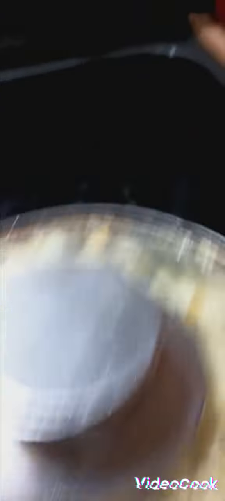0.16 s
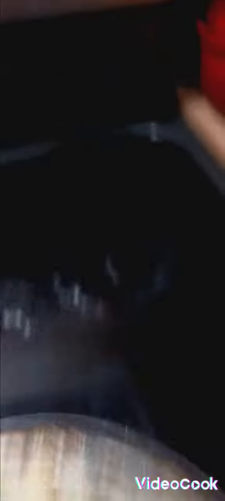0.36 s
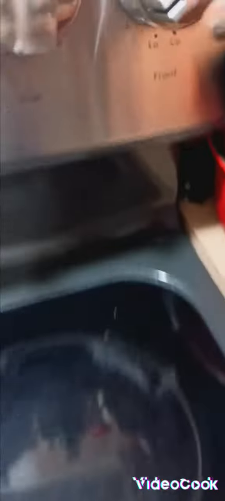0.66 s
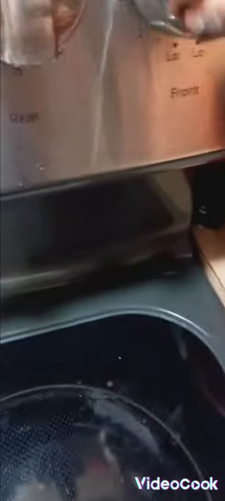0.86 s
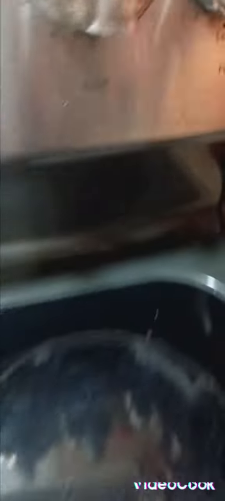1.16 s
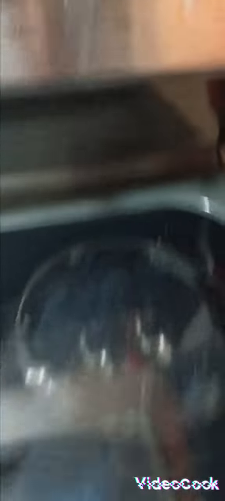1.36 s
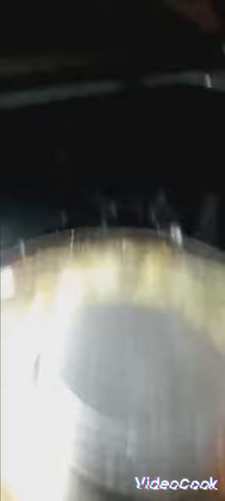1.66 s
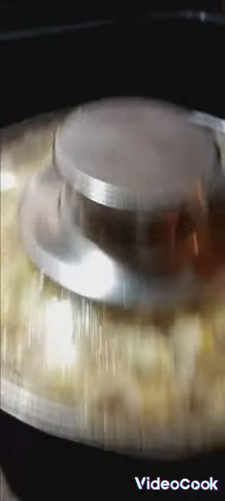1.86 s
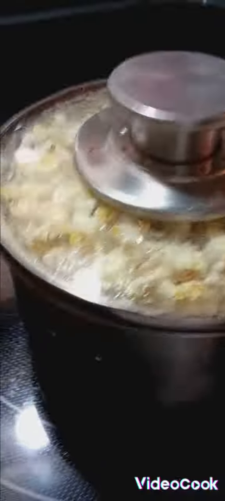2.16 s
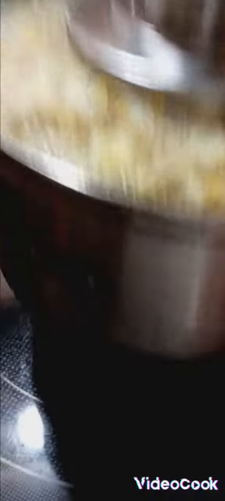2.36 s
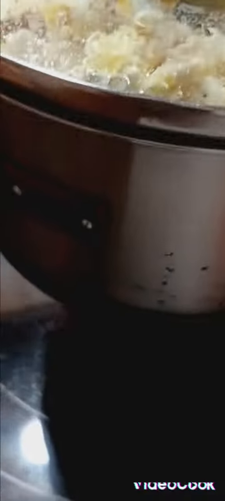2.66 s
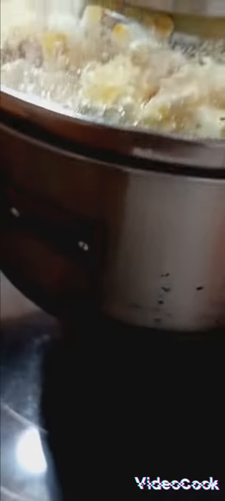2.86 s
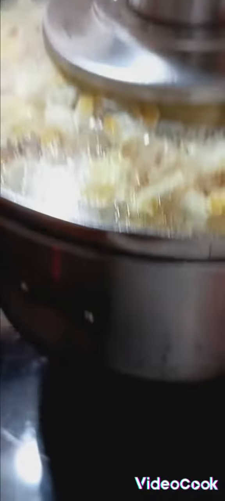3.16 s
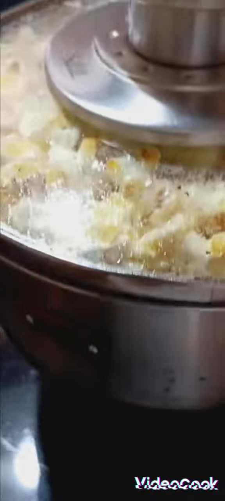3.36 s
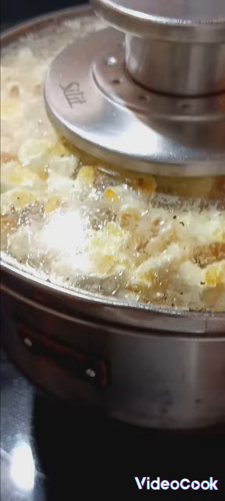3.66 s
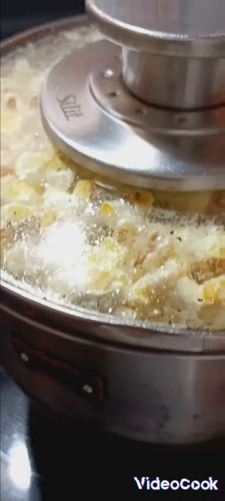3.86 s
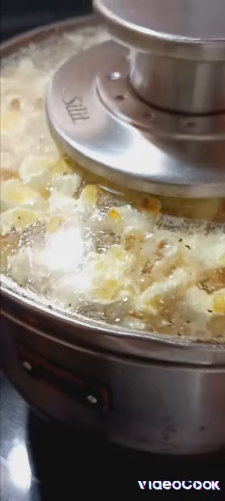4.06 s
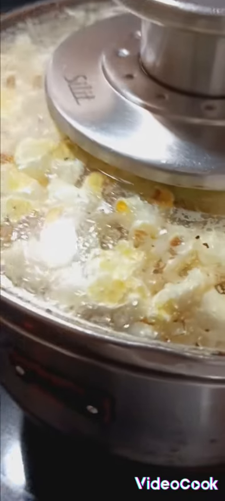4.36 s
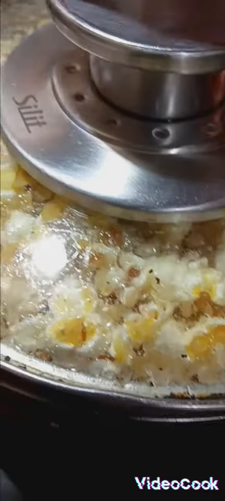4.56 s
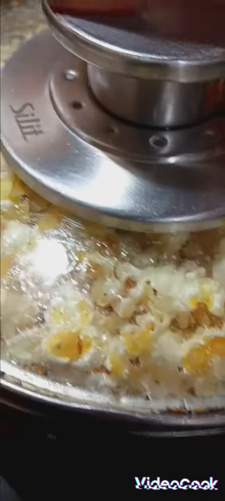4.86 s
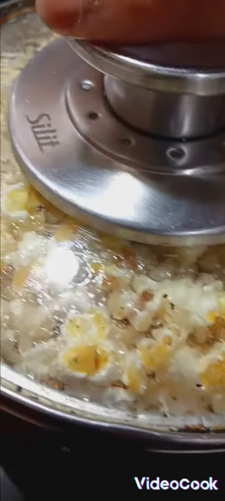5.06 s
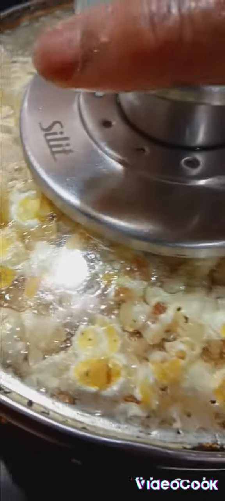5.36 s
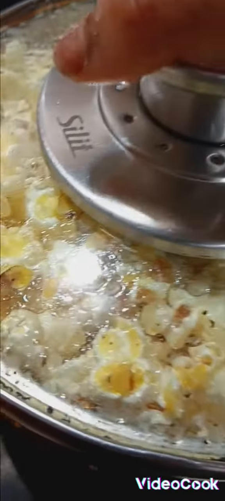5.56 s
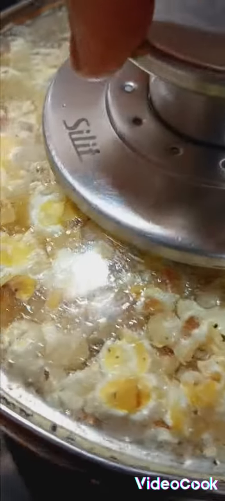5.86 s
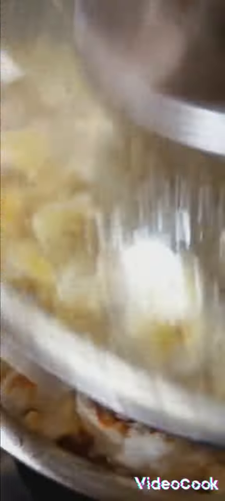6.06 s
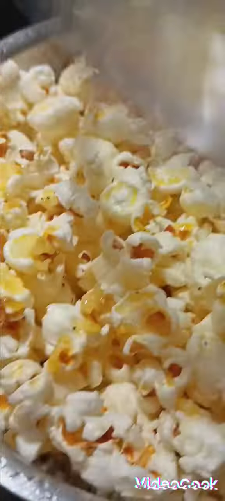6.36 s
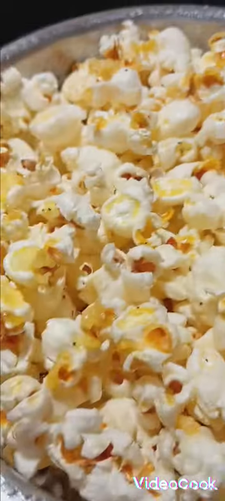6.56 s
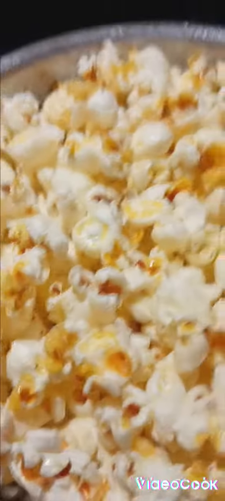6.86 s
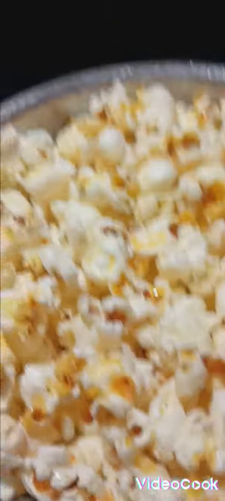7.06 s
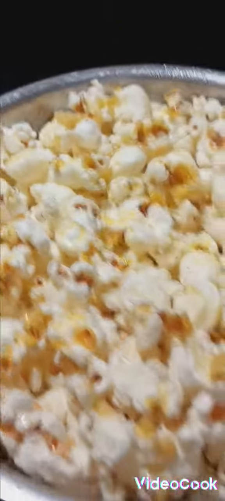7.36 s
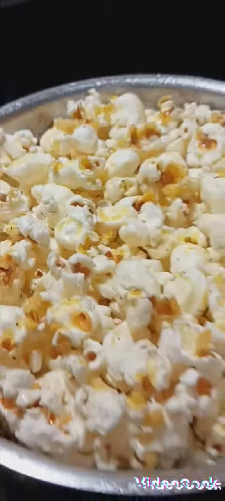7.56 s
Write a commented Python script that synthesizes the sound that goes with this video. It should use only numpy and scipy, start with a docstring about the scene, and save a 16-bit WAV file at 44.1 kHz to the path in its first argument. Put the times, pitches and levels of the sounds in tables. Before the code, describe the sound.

A close, hand-held stereo microphone at a kitchen stove hears a faint low hum, thin bright oil sizzle with tiny crackles, and soft low handling bumps. After a faint rustle, kernels burst in a covered steel pot from about 0.8 to 1.1 s: hollow thumps, sharp cracks and ringing clacks, the pops leaning left, with a soft noisy tail. A duller, heavier knock comes at 1.7 s and a faint one near 2. Then it is quiet, with small oil spits at 3.4 and 4.2 s. One lone pop sounds at 4.4 s; the sound drops out from 4.5 to 4.9 s. Spits and a very faint steam whistle follow, and the sizzle opens up near 6 s as the lid lifts. Dry hull ticks snap, clearest at 6.6 s. From 6.7 s to the end, corn knocks and rattles hard against the metal, with low thumps, droning and rustling.

```python
"""Last kernels in a popcorn pot

The last kernels burst in a steel pot on a stove; the lid comes off and the corn knocks and rattles.
Each blow layers a low thump of air, a clank of the pot and a hull's crack, with diffuse tails.
Blows are shaped noise and decaying sines; hot oil sizzles and spits in bright noise over a low hum.
The hand-held microphone rumbles with low bumps, and the sound cuts out once."""
import sys
import numpy as np
from scipy import signal
from scipy.fft import rfft, irfft, next_fast_len
from scipy.io import wavfile
from scipy.ndimage import uniform_filter1d

SR = 44100
rng = np.random.default_rng(int(sys.argv[2]) if len(sys.argv) > 2 else 0)


def wrap_up_sound(samples):
    """Save the sound to the file named by the first command line argument, as 16-bit audio."""
    columns = np.atleast_2d(samples).T
    # keep every value between -1 and 1, then stretch to whole-number steps
    tamed = np.clip(columns, -1, 1)
    steps = np.round(tamed * 32767).astype(np.int16)
    wavfile.write(sys.argv[1], SR, steps)


N = 340452
TOP_HZ = 16300  # nothing is heard above this
BLOW_S = .03  # a blow at 0 dB has the energy of rms 1 held this long
T = np.arange(int(.5 * SR)) / SR  # time within one short sound, s


def amp(db):
    """Decibels to gain."""
    return 10 ** (np.asarray(db) / 20)


def unit(x):
    """Scale to rms 1."""
    return x / np.sqrt(np.mean(x ** 2) + 1e-20)


def blow(x):
    """Scale a short sound to the energy of one blow at 0 dB."""
    return unit(x) * np.sqrt(BLOW_S * SR / len(T))


def curve(rows):
    """Draw a line through (time_s, value) rows, one value per sample."""
    time_s, values = np.transpose(rows)
    return np.interp(np.arange(N) / SR, time_s, values)


def swell(start, end):
    """A smooth arch between two times."""
    progress = (np.arange(N) / SR - start) / (end - start)
    return np.sin(np.pi * np.clip(progress, 0, 1))


def fade(t60, rise):
    """A soft start and an exponential decay."""
    attack = 1 - np.exp(-(T / max(rise, 1e-4)) ** 2)
    return attack * np.exp(-np.log(1000) * T / max(t60, 1e-3))


def add(track, s, x):
    """Mix x into track at time s."""
    part = track[:, max(round(s * SR), 0):][:, :x.shape[-1]]
    part += x[..., :part.shape[-1]]


def panned(x, pan_db):
    """Make x louder on the left by pan_db."""
    return x * unit(amp([[pan_db / 2], [-pan_db / 2]]))


def coloured(x, points):
    """Filter x through a spectrum of (Hz, dB) points that falls away beyond its ends."""
    size = next_fast_len(x.shape[-1] + 4096)
    hz = np.fft.rfftfreq(size, 1 / SR) + 1  # 1 Hz up, so that the logarithm exists
    f, db = np.transpose(points)
    gain = amp(np.interp(np.log(hz), np.log(f), db))
    gain *= np.minimum(1, hz / f[0]) ** 2 * np.minimum(1, f[-1] / hz) ** 2
    return unit(irfft(rfft(x, size) * gain, size)[..., :x.shape[-1]])


def noise(points, size, alike=0.):
    """Stereo noise of rms 1; alike is the share of power that both sides have in common."""
    left, right, both = rng.standard_normal((3, size))
    share = np.clip(alike, 0, 1)
    sides = np.sqrt(1 - share) * np.array([left, right])
    return coloured(sides + np.sqrt(share) * both, points)


def resonance(hz, width):
    """Spectrum points of one peak with a relative width."""
    return [(hz * (1 - 3 * width), -40), (hz * (1 - width), -6), (hz, 0),
            (hz * (1 + width), -6), (hz * (1 + 3 * width), -40)]


def band(hz, width):
    """A narrow wavering tone, made of noise through one resonance."""
    return noise(resonance(hz, width), N, alike=0.7)


# colour of the stove's hum: pitch_hz [Hz], relative level_db [dB per Hz]
HUM_COLOUR = [(47, -29.5), (80, -7.5), (128, -1.5), (146, -19.5), (228, -6.5), (275, -8.5), (314, -16.5),
              (431, -16), (473, -25), (581, -20), (638, -25), (784, -22.5), (1020, -29), (3020, -40),
              (7000, -45), (9100, -76.5), (15400, -120)]
# colour of the low rumble: pitch_hz [Hz], relative level_db [dB per Hz]
RUMBLE_COLOUR = [(18, -12), (40, 0), (65, -4), (90, -13.5), (160, -32)]
# the low drone as the pot is moved on the hob: time_s [s], level_db [dB]
POT_DRONE = [(6.7, -93), (6.85, -41), (7.05, -43.5), (7.25, -33.5), (7.42, -55.5), (7.57, -38), (7.72, -46)]


def background(hum_db=-58.5, shaken_db=-5):
    """The stove hums, and the pot drones as it is moved on the hob; the drone lifts the hum too."""
    drone = amp(curve(POT_DRONE))
    hum = (amp(hum_db) + amp(shaken_db) * drone) * noise(HUM_COLOUR, N, alike=0.16)
    low_note = band(122, 0.22) + amp(-5) * noise(RUMBLE_COLOUR, N, alike=.9)
    return hum + drone * low_note


BUMP_PERIOD_S, BUMP_LENGTH_S = .208, .11
BUMP_DB, BUMP_HZ = -42, 46.6  # peak level; middle of the scattered pitches
# trains of low bumps on the microphone: start_s [s], end_s [s]
BUMP_TRAINS = [(.08, .6), (1.335, 1.65), (2.382, 2.9), (3.619, 4.15), (5.485, 6.2)]


def bumps(rumble_db=-64):
    """Arched low sines bump the hand-held microphone in short even trains, over a faint rumble."""
    out = amp(rumble_db) * noise(RUMBLE_COLOUR, N, alike=1.0)
    arch = np.sin(np.pi * np.minimum(T / BUMP_LENGTH_S, 1)) ** 2
    for start, end in BUMP_TRAINS:
        for s in np.arange(start, end, BUMP_PERIOD_S):
            hz = BUMP_HZ * np.exp(0.12 * rng.standard_normal())
            phase = rng.uniform(0, 2 * np.pi)
            add(out, s, amp(BUMP_DB) * np.sin(2 * np.pi * hz * T + phase) * arch)
    return out


HOLLOW_HZ = 244
# swells of the hollow note: start_s [s], end_s [s], level_db [dB]
HOLLOW_SWELLS = [(1.13, 1.302, -43.5), (1.467, 1.538, -45), (1.621, 1.707, -45.5), (2.132, 2.266, -56.5),
                 (5.756, 5.868, -47.5)]


def hollow():
    """The low note of the pot's air swells softly now and then."""
    level = sum(amp(db) * swell(start, end) for start, end, db in HOLLOW_SWELLS)
    return level * band(HOLLOW_HZ, .11)


# thin whistles of steam under the lid: start_s [s], end_s [s], pitch_hz [Hz], level_db [dB]
STEAM_WHISTLES = [(4.756, 5.884, 938, -73), (5.098, 5.299, 10600, -63.5), (5.631, 5.72, 5450, -69)]


def steam():
    """Steam swells and dies in the gap under the lid as narrow bands of noise."""
    return sum(amp(db) * swell(start, end) * band(hz, min(40 / hz, .2))
               for start, end, hz, db in STEAM_WHISTLES)


def uneven(points, depth_db, order=84):
    """The pot's hollow puts peaks and dips into a spectrum, new ones for every burst."""
    f, db = np.transpose(points)
    hz = np.geomspace(100, TOP_HZ, order)
    ripple = depth_db * np.clip(rng.standard_normal(order), -2, 1)
    inside = (hz >= f[0]) & (hz <= f[-1])
    return np.transpose([hz, np.interp(np.log(hz), np.log(f), db) + ripple])[inside]


def burst(points, rise, t60, tail_db, tail_t60, ripple_db=6, grain_db=3):
    """A grainy burst and a diffuse tail with less treble."""
    colour = uneven(points, ripple_db)
    grains = amp(grain_db * unit(uniform_filter1d(rng.standard_normal(len(T)), size=70)))
    direct = blow(noise(colour, len(T)) * fade(t60, rise) * grains)
    # the tail falls 3 dB per kHz above 10.5 kHz
    dull = colour - np.outer(np.maximum(colour[:, 0] - 10500, 0), [0, .003])
    tail = blow(noise(dull, len(T)) * fade(tail_t60, rise + 0.004))
    return direct + amp(tail_db) * tail


SIZZLE_DB, COOLING_DB_PER_S = -69.5, 1.1  # level of the fizz at the start, and how fast it sinks
# swells as the lid lifts and as the pot is shaken: start_s [s], end_s [s], gain_db [dB], kept afterwards
SIZZLE_RISES = [(5.6, 6.088, 9), (6.6, 6.98, 10.5)]


def sizzle_db():
    """The oil cools steadily, but is heard better once it is uncovered and shaken."""
    t = np.arange(N) / SR
    lifts = sum(np.interp(t, [start, end], [0, db]) for start, end, db in SIZZLE_RISES)
    return SIZZLE_DB - COOLING_DB_PER_S * t + lifts


SPIT_DB = -52
# colour of the sizzle: pitch_hz [Hz], relative level_db [dB per Hz]
SIZZLE_COLOUR = [(1500, -36.5), (4000, -15), (7800, -15), (8900, -0.5), (9600, -1.5), (10600, 2),
                 (12000, -14.5), (16000, -23)]
# colour of a spit: pitch_hz [Hz], relative level_db [dB per Hz]
SPIT_COLOUR = [(3000, -53), (8000, -30), (9000, 12), (9700, -7), (10700, -11), (12500, -31.5)]
# loud spits of hot oil: time_s [s], placed 2 ms early
SPIT_TIMES = [3.3543, 4.2363, 4.9347, 5.4051, 5.7538]


def oil(rate=30, crackle_db=-3, flicker_db=3.5):
    """Hot oil fizzes unevenly, with tiny random ticks (rate per second) and a few louder spits."""
    ticks = (rng.random((1, N)) < rate / SR) * amp(5.4 * rng.standard_normal((1, N)))
    tick = noise(SIZZLE_COLOUR, len(T)) * fade(0.044, 0.00054)
    crackle = unit(signal.fftconvolve(ticks, tick, axes=1)[:, :N])
    # smooth random patches over pitch and time make the fizz flicker
    spectrum = signal.stft(noise(SIZZLE_COLOUR, N), nperseg=512)[2]
    patches = uniform_filter1d(rng.standard_normal(spectrum.shape[1:]), size=5, axis=0)
    patches = uniform_filter1d(patches, size=16, axis=1)
    flickering = spectrum * amp(flicker_db * unit(patches))
    fizz = unit(signal.istft(flickering, nperseg=512)[1][:, :N])
    out = amp(sizzle_db()) * (fizz + amp(crackle_db) * crackle)
    for s in SPIT_TIMES:
        spit = burst(SPIT_COLOUR, 0.0042, 0.052, tail_db=-16, tail_t60=0.31, ripple_db=2.0)
        add(out, s - .002, amp(SPIT_DB) * spit)
    return out


# low answer of stove top and kitchen: pitch_hz [Hz], relative level_db [dB per Hz]
BOOM_COLOUR = [(45, -23), (120, -2.5), (170, -12), (243, -1.5), (310, -11.5), (500, -28), (900, -44.5)]


def boom(t60, rise):
    """The stove top and the kitchen's low resonances answer a blow."""
    return blow(noise(BOOM_COLOUR, len(T), alike=0.99) * fade(t60, rise))


# body of the metal: pitch_hz [Hz], relative level_db [dB per Hz]
CLANK_COLOUR = [(150, -27.5), (330, -0.5), (620, -3.5), (1300, -4.5), (1700, -9.5), (2600, -34.5)]
# crack of a hull: pitch_hz [Hz], relative level_db [dB per Hz]
CRACK_COLOUR = [(1000, -33.5), (1700, -2.5), (2400, -0.5), (3000, -3.5), (4200, -0.5), (5500, -9),
                (8000, -31)]
# bright edge of a blow: pitch_hz [Hz], relative level_db [dB per Hz]
SNAP_COLOUR = [(4000, -29), (6200, -3), (7500, -5.5), (8900, 1), (9600, -1), (10500, 1.5), (12000, -7.5),
               (16000, -25.5)]


def rustle(rise, t60, low_db, mids_db, top_db):
    """A noisy rustle; its level runs from low end to top end, with the mids offset by mids_db."""
    levels = np.linspace(low_db, top_db, 4) + mids_db * np.array([0, 1, 1, 0])
    colours = (BOOM_COLOUR, CLANK_COLOUR, CRACK_COLOUR, SNAP_COLOUR)
    return sum(amp(db) * burst(colour, rise, t60, tail_db=-14.0, tail_t60=.35)
               for colour, db in zip(colours, levels))


RUSTLE_T60_S, RUSTLE_SPREAD = .17, 5.7  # decay of a sudden rustle; extra decay per second of rise
# soft rustles, and noisy tails that follow some blows:
# time_s [s], rise_s [s], low_end_db [dB], mids_offset_db [dB], top_end_db [dB]
RUSTLES_AND_TAILS = [(.06, 0.013, -80, 0.5, -53.5), (.41, 0.0056, -89, -7, -54.5),
                     (.70, .04, -76.5, 0, -50), (1.135, 0.018, -44, -1, -39),
                     (1.735, 0.054, -41.5, -7, -51), (1.89, 0.031, -48.5, 3, -54.5),
                     (5.784, 0.016, -48, -6.5, -54), (7.1, 0.028, -38, 7.5, -36.5),
                     (7.475, 0.024, -57.5, 7, -49.5), (7.561, 0.065, -49, 5.5, -49)]


def rustles_and_tails():
    """Soft rustles, and noisy tails that follow some blows, as bursts in four colours."""
    out = np.zeros((2, N))
    for s, rise, *levels in RUSTLES_AND_TAILS:
        add(out, s, rustle(rise, RUSTLE_T60_S + RUSTLE_SPREAD * rise, *levels))
    return out


TICK_RISE_S, TICK_T60_S = .0007, 0.074
TICK_CRACK_DB = -27.5  # crack against snap
# dry hulls tick as the lid lifts: time_s [s], snap_db [dB]
HULL_TICKS = [(6.057, -61), (6.298, -58.5), (6.427, -59.5), (6.5634, -34), (6.5885, -40)]


def hull_ticks():
    """Dry hulls give a thin snap with a trace of crack."""
    out = np.zeros((2, N))
    for s, db in HULL_TICKS:
        for colour, level_db in ((SNAP_COLOUR, db), (CRACK_COLOUR, db + TICK_CRACK_DB)):
            tick = burst(colour, TICK_RISE_S, TICK_T60_S, tail_db=-12.5, tail_t60=0.18, ripple_db=4)
            add(out, s, amp(level_db) * tick)
    return out


# air notes of the thump: pitch_hz [Hz], before a small random detune, level_db [dB], t60_s [s]
AIR_NOTES = [(242, 2, 0.055), (115, -10, 0.06), (300, -4.5, 0.022)]


def thump(rise, room_db):
    """A puff sets the air ringing in decaying sines; the room holds on to its main note."""
    pitch = 1 + 0.012 * rng.standard_normal()
    air = sum(amp(db) * np.sin(2 * np.pi * hz * pitch * T) * fade(t60, rise / 2)
              for hz, db, t60 in AIR_NOTES)
    highpass = signal.butter(2, 65, "highpass", fs=SR, output="sos")
    air = blow(signal.sosfilt(highpass, air))
    held = blow(noise(resonance(245, 0.18), len(T), alike=.85) * fade(0.5, 0.015))
    return air + amp(room_db) * held


def from_right(pair, left_lag_s=.00095):
    """Low sound reaches the right side first."""
    return np.array([np.interp(T - left_lag_s, T, pair[0], left=0), pair[1]])


# modes of the pot's wall: pitch_hz [Hz], level_db [dB] before random scatter, t60_s [s]
STEEL_MODES = [(623, 4, .14), (702, 1, .12), (820, -2, .12), (1058, -5, 0.16), (1299, -2.5, 0.17),
               (1420, -11, 0.35), (1908, -0.5, 0.16), (2220, 0, 0.14), (2520, -7.5, 0.086),
               (3446, -1, 0.15), (4000, -4.5, 0.16), (4740, -3, .08)]


def ring(rise, scatter_db):
    """Steel modes ring as sines; each blow, and each side, meets them at new strengths and phases."""
    hz, db, t60 = np.transpose(STEEL_MODES)
    count = len(hz)
    scatter = rng.standard_normal(count) + .5 * rng.standard_normal((2, count))
    size = amp(db + scatter_db * scatter)
    phase = rng.uniform(0, 2 * np.pi, (2, count))
    return blow(sum(size[:, [k]] * np.sin(2 * np.pi * hz[k] * T + phase[:, [k]]) * fade(t60[k], rise)
                    for k in range(count)))


def spot(hz, rise, t60):
    """One spot of the pot rings briefly and leaves a faint tail."""
    tone = noise(resonance(hz, np.sqrt(3.5 / hz)), len(T))
    return blow(tone * (fade(0.86 * t60, rise) + 0.0541 * fade(0.32, 0.011)))


def strike(rise, t60, thump_db, clank_db, crack_db, snap_db, ring_hz, ring_db):
    """One blow in the pot: thump, clank, crack, snap and the resonance of the spot that is hit."""
    low = amp(thump_db) * thump(rise, room_db=-19.5)
    # the harder the clank, the more the stove top booms with it
    low = low + amp(1.5 * clank_db + 3.5) * boom(0.24, .015)
    x = from_right(low)
    x += amp(clank_db - 2.0) * burst(CLANK_COLOUR, rise, 1.94 * t60, tail_db=-9.5, tail_t60=.25)
    x += amp(crack_db) * burst(CRACK_COLOUR, rise, t60, tail_db=-10.5, tail_t60=.25)
    x += amp(snap_db) * burst(SNAP_COLOUR, rise, .85 * t60, tail_db=-6.5, tail_t60=0.18)
    x += amp((clank_db + crack_db) / 2 - 7) * ring(rise, scatter_db=2)
    return x + amp(ring_db) * spot(ring_hz, rise, t60)


CLACK_RISE_S, CLACK_T60_S, CLACK_RING_DB = .002, 0.07, 1.5  # ring against crack
WALL_HZ, WALL_DB = 2257, -3.5  # every clack also rings the wall's bright note, this far under its crack
# light pieces clack against the wall: time_s [s], crack_db [dB], ring_hz [Hz]
WALL_CLACKS = [(0.8265, -38, 2400), (0.8353, -36, 2300), (0.8801, -25, 4576), (1.0012, -46, 1590),
               (1.096, -48, 4420), (7.284, -44, 1850)]


def clacks(thump_db=-16, clank_db=-2, snap_db=-1.0):
    """Light pieces hit the wall: hardly any thump, but the metal rings clearly."""
    out = np.zeros((2, N))
    for s, db, ring_hz in WALL_CLACKS:
        x = strike(CLACK_RISE_S, CLACK_T60_S, db + thump_db, db + clank_db, db, db + snap_db,
                   ring_hz, db + CLACK_RING_DB)
        wall = amp(db + WALL_DB) * spot(WALL_HZ, CLACK_RISE_S, CLACK_T60_S)
        add(out, s, x + wall)
    return out


SETTLE_DELAY_S, SETTLE_RISE_S, SETTLE_T60_S = .015, 0.023, 0.2
SETTLE_LOW_DB, SETTLE_HIGH_DB, SETTLE_MIDS_DB = -6, -15.5, -8  # against thump, against snap, mids offset


def settle(thump_db, snap_db):
    """The corn thrown up by a knock falls back, as heavy and as bright as the knock was."""
    low_db, top_db = thump_db + SETTLE_LOW_DB, snap_db + SETTLE_HIGH_DB
    return rustle(SETTLE_RISE_S, SETTLE_T60_S, low_db, SETTLE_MIDS_DB, top_db)


KNOCK_T60_S, KNOCK_SPREAD = .048, 4.3  # decay of a sudden knock; extra decay per second of rise
KNOCK_RING_DB = -3  # ring against crack
# the pot is jolted and the corn knocks against it:
# time_s [s], rise_s [s], crack_db [dB], brightness_db [dB], thump_db [dB], ring_hz [Hz]
CORN_KNOCKS = [(0.565, .014, -43.5, 3, -70, 5300), (1.677, .009, -34.5, -6, -23.5, 719),
               (1.981, .003, -52, -5, -43, 800), (6.729, .002, -20.5, -2.5, -18.5, 696.6),
               (6.7879, .0015, -26, -5, -19, 980), (6.9497, 0.00072, -27.5, -5.5, -20, 1165),
               (7.0742, .0005, -22, 1, -34.5, 830), (7.1688, .0005, -24.5, -6, -41, 575),
               (7.23, .005, -39.5, -1, -35.5, 637), (7.505, .016, -31, -2.5, -38.5, 840),
               (7.655, 0.0037, -23, -3, -41, 855)]


def knocks():
    """A mass of corn meets the metal; a brighter knock trades clank for snap, a slower one lasts longer."""
    out = np.zeros((2, N))
    for s, rise, db, bright_db, thump_db, ring_hz in CORN_KNOCKS:
        t60 = KNOCK_T60_S + KNOCK_SPREAD * rise
        knock = strike(rise, t60, thump_db, db - bright_db, db, db + bright_db,
                       ring_hz, db + KNOCK_RING_DB)
        add(out, s, knock)
        add(out, s + SETTLE_DELAY_S, settle(thump_db, db + bright_db))
    return out


POP_RISE_S, POP_T60_S = 0.0015, .04
# kernels burst, strike() blends the levels: time_s [s], thump_db [dB], clank_db [dB], crack_db [dB],
# snap_db [dB], ring_hz [Hz], ring_db [dB], left_minus_right_db [dB]
KERNEL_POPS = [(0.7856, -14.5, -39, -35, -29.5, 2340, -41.5, 8.5),
               (1.0385, -13.5, -34, -31, -22.5, 1400, -35.5, 7.5),
               (1.117, -20, -45, -23.5, -23, 8800, -22.5, 6),
               (4.405, -15.5, -30, -38.5, -31, 1400, -31, -0.5)]


def pops():
    """A kernel bursts: its puff of steam thumps, the pot clanks and the hull cracks."""
    out = np.zeros((2, N))
    for s, *blend, pan_db in KERNEL_POPS:
        add(out, s, panned(strike(POP_RISE_S, POP_T60_S, *blend), pan_db))
    return out


def scene():
    """Everything at the stove, from the background to the bursting kernels."""
    beds = background() + bumps() + hollow() + steam() + oil()
    corn = rustles_and_tails() + hull_ticks() + clacks() + knocks() + pops()
    return beds + corn


# the sound cuts out and returns: time_s [s], gain_db [dB]
DROPOUT = [(4.498, -1.5), (4.506, -57), (4.85, -45.5), (4.89, -16), (4.97, -2)]


def record(dry, left_top_db=-6):
    """The sound cuts out once; the left port is duller at the very top; peaks stop at full scale."""
    size = next_fast_len(N + SR // 2)
    hz = np.fft.rfftfreq(size, 1 / SR)
    # the treble tilt grows from 9 to 11.5 kHz: left down, right slightly up
    ports = amp(np.outer([left_top_db, 1.5], np.clip((hz - 9000) / 2500, 0, 1)))
    x = irfft(rfft(dry * amp(curve(DROPOUT)), size) * ports, size)
    clipped = np.clip(x, -1, 1)
    return irfft(rfft(clipped) * (hz < TOP_HZ), size)[:, :N]


dry = scene()
out = record(dry)
wrap_up_sound(out)
```